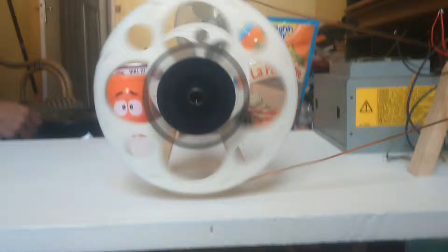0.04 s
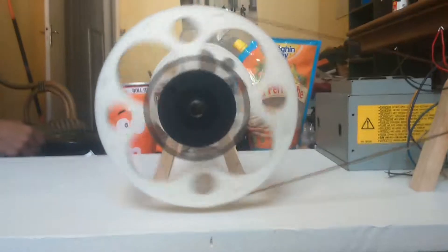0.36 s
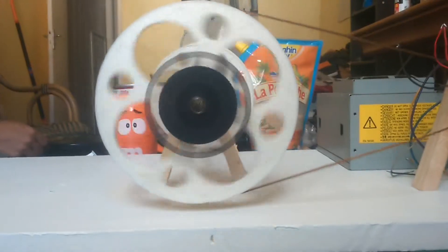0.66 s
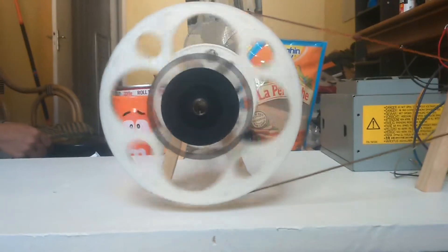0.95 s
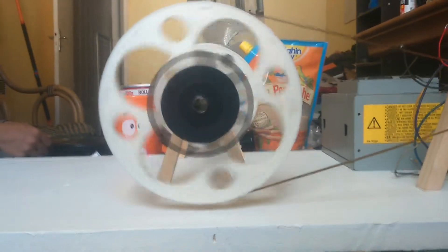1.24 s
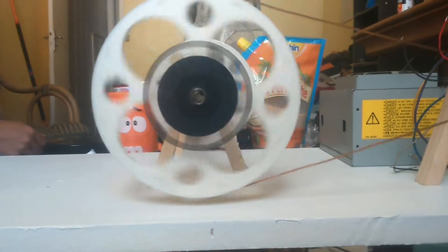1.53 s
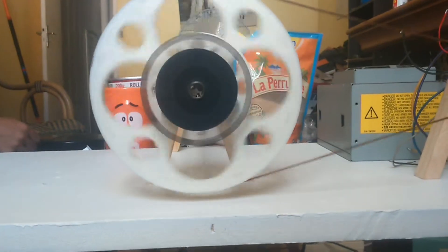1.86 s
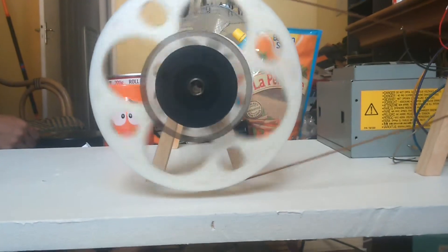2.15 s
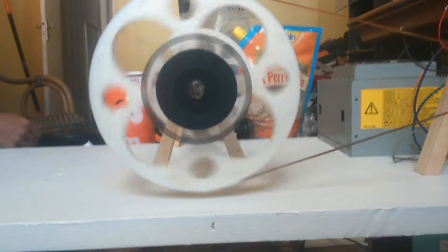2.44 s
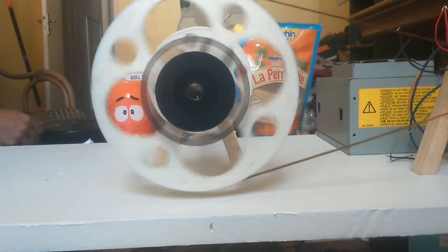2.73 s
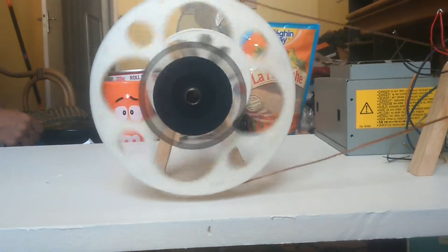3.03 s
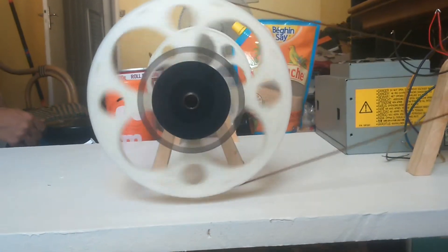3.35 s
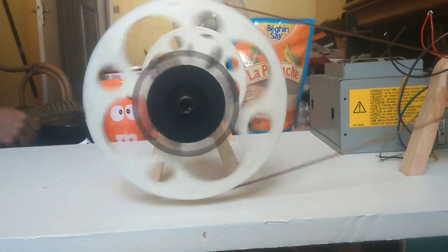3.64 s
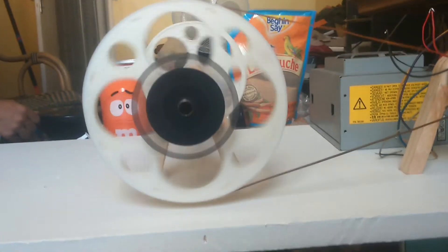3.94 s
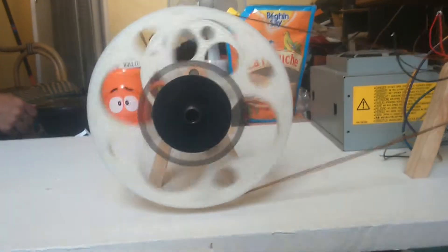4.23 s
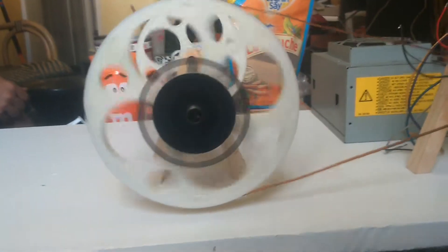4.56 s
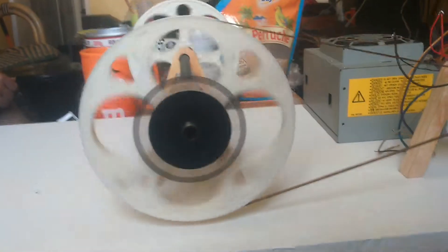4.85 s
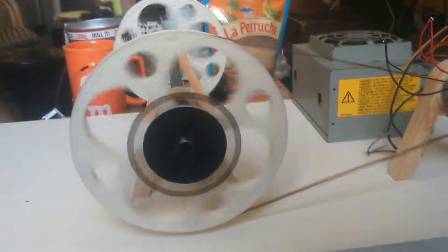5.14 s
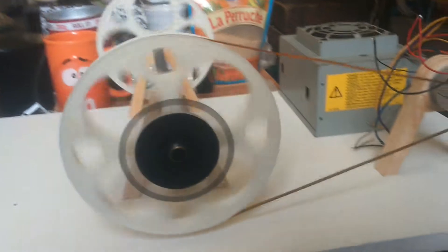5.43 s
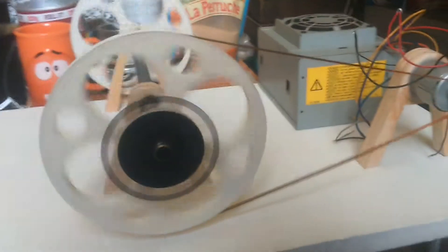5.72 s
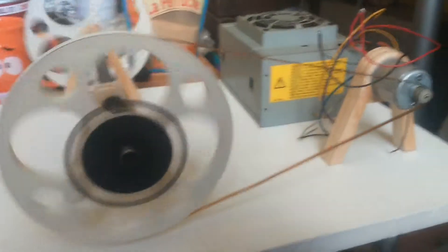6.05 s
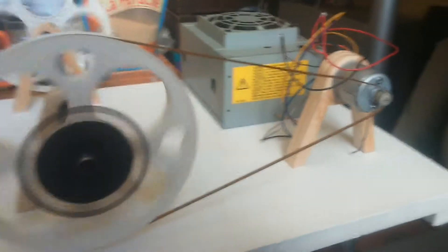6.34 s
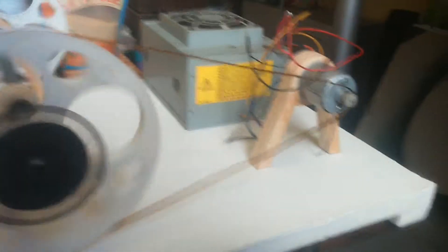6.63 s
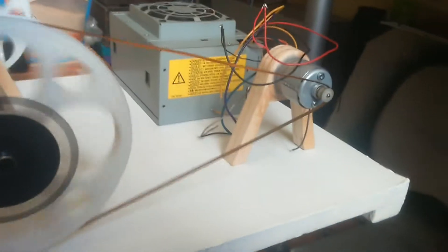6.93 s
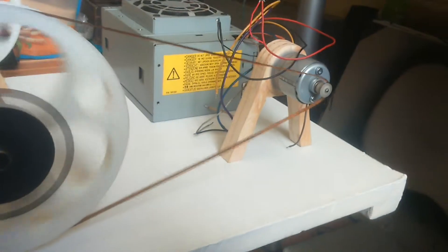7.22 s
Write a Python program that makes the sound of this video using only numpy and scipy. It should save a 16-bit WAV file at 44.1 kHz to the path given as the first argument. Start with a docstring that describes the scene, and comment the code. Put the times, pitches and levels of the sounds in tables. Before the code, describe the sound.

A small motor hums and whirs while a belt knocks over pulleys about once a second, with a friction hiss swelling later.

```python
"""On a workshop table, a small motor drives a large plastic pulley through a thin belt.
Once a lap the belt joint knocks over the pulleys and excites the modes of their wooden stands.
The motor's hum beats against the mains hum of its supply, the bearings whir and the table rumbles.
A friction hiss swells as the listener nears the motor. Parts tick and clink; the belt squeaks once."""
import sys
import numpy as np
from scipy import signal
from scipy.fft import rfft, irfft, next_fast_len
from scipy.io import wavfile
from scipy.ndimage import uniform_filter1d

SR = 44100
rng = np.random.default_rng(int(sys.argv[2]) if len(sys.argv) > 2 else 0)


def put_to_file(sound):
    """Save the sound as 16-bit audio at rate SR, in the file named by the first command-line argument."""
    columns = np.atleast_2d(sound).T  # one column per channel
    safe = np.clip(columns, -1, 1)
    whole_steps = np.round(safe * 32767)
    wavfile.write(sys.argv[1], SR, whole_steps.astype(np.int16))


N = 329868
T = np.arange(N) / SR
MOTOR_HZ, MAINS_HZ = 47.775, 50.005

# The belt joint returns about every 0.92 s. Each row: start in seconds, then gains in dB
# for the whole lap, the bass, the middle, the treble and the late rattle.
LAPS = [(0.361, -7.5, 2.5, -0.5, 6.5, 5.5), (1.284, 0, 4.5, -2, -3, -6.5), (2.198, 2, -1.5, -4, -1.5, -1),
        (3.116, -.5, -2, -4, -3, 3.5), (4.036, 1, -1.5, -4, 1, 2.5), (4.954, -2, 2.5, 2.5, 0, -3),
        (5.874, -2, 3.5, 3.5, -2.5, -4), (6.791, 0.5, 0, 3, 3.5, -8)]
# The blows within a lap. Each row: delay in seconds, then overall, bass and treble gains in dB.
BOUNCES = [(-.0045, -6.5, 1.5, -3), (0, 2, -2, 2), (.0098, -6.5, 8.5, -4), (.0197, 0, 11.5, -3.5),
           (.0295, -2.5, 6.5, 3), (.059, -10.5, 11, 1), (.079, -13.5, 12.5, -19), (.103, -6, -8, -18)]
# Modes of the stands and table top. Each row: frequency in Hz, relative level in dB, T60 in seconds.
STAND_MODES = [(142, -41, 0.22), (205.2, 0, 0.12), (265.7, 5, 0.065), (291.4, -9, 0.19), (372, -2, 0.047),
               (417.4, -8.5, 0.24), (454, -2.5, 0.2), (568, -7, 0.24), (627, -1.5, 0.033),
               (705.7, 6.5, 0.095), (747, -5.5, 0.29), (767, 9.5, 0.092), (780, 8, 0.058),
               (880, 15.5, 0.036), (990, -47, 0.018), (980, -13.5, 0.48), (1124, -18.5, 0.16),
               (1349, -6, 0.086), (1534, 3.5, 0.11), (1536, 7, 0.046), (1882, 4, 0.013), (2150, -8, 0.064),
               (2450, -36, 0.076), (2960, -10, 0.037)]
# Harmonics of the shaft. Each row: multiple of the rotation rate, rms level in dB.
SHAFT_ORDERS = [(2, -82), (3, -70.5), (4, -74.5), (5, -86.5), (7, -75.5), (9, -86.5), (11, -81.5),
                (12, -84.5), (16, -84.5)]
# Flutter of the free belt spans. Each row: frequency in Hz, rms level in dB.
BELT_FLUTTER = [(34.3, -74), (68.55, -64.5)]
# Motor whines. Each row: frequency in Hz, relative level in dB, fractional spread of pitch.
WHINES = [(3410, -25.5, 0.00555), (7270, 6, 0.00516), (7550, 1, 0.00041), (9240, -1, .0015),
          (12100, -19, 0.0062)]
# Ticks, scrapes and a snap. Each row: start in seconds, level in dB, pitch and width in Hz, T60 in seconds.
TICKS = [(1.331, -52.5, 2590, 2400, .12), (1.943, -58.5, 9000, 3500, .09), (2.260, -59.5, 8850, 3000, .1),
         (2.597, -54, 7800, 2600, .07), (4.085, -69, 4020, 4000, 0.74), (5.926, -54.5, 2400, 2470, 0.44),
         (6.1432, -36, 7600, 2510, 0.0087), (6.2099, -36, 10900, 7100, 0.011),
         (6.2172, -37.5, 8250, 2660, 0.051), (6.2208, -41, 3470, 800, 0.039),
         (6.223, -46.5, 2080, 1700, 0.057)]
# Clinks of a loose part. Each row: start in seconds, level in dB.
CLINKS = [(2.597, -57), (3.255, -41.5), (3.284, -44.5), (3.299, -50)]
# Workshop reverberation. Each row: frequency in Hz, T60 in seconds.
ROOM_T60 = [(150, 0.86), (400, 0.93), (1000, 0.37), (3000, 1), (12000, 0.083)]

# Noise spectra. Each row: frequency in Hz, relative spectral density in dB.
CLATTER_SPECTRUM = [(80, -40), (135, -26), (200, -11), (245, -12), (360, -17), (440, -13), (570, -9),
                    (670, -1), (750, 0), (970, -4), (1190, -19), (1550, -12), (1780, -22), (2150, -21),
                    (3000, -29), (4400, -46), (7000, -66), (13000, -100)]
WHIR_SPECTRUM = [(150, -18), (260, 3.5), (309, 3.5), (337, -5), (359, 0), (448, -3), (477, -4.5), (674, -2),
                 (782, -1), (1400, -10.5), (2440, -9), (2630, -9), (3450, -19), (5000, -21.5),
                 (6500, -13.5), (11000, -120)]
SOFT_RUB_SPECTRUM = [(3500, -28), (4800, -16), (5800, -4), (7200, 0), (8600, 3), (10300, -4), (12800, -9),
                     (15700, -12)]
RINGING_RUB_SPECTRUM = [(3000, -40), (4600, -28), (5700, -14), (6500, -11), (7200, 1), (8200, -6),
                        (8800, -1), (9400, -5), (10100, -16), (11500, -7), (12100, -14), (13000, -11),
                        (13500, -14), (15700, -21)]
RUMBLE_SPECTRUM = [(22, -32), (33, -14), (42, 7), (55, 0.5), (67, 10.5), (82, -8), (115, -8.5),
                   (132, -13.5), (148, 2), (180, -3.5), (206, 5.5), (228, -9.5), (300, -30), (420, -36),
                   (3000, -77)]
RUSH_SPECTRUM = [(70, -20), (110, -13), (150, -12.5), (210, -11), (330, -5.5), (700, -13), (1150, -22),
                 (2500, -20.5), (3300, -28.5), (4700, -28.5), (5500, -24), (6500, -31), (10000, -38),
                 (15700, -40)]

# Noise envelopes. Each row: time in seconds, base level in dB.
WHIR_LEVELS = [(.4, -66), (3.0, -68), (5.6, -62), (7.48, -64.5)]
RUB_LEVELS = [(0.46, -63.5), (1.24, -66.5), (1.35, -64.5), (2.9, -66), (4.39, -59.5), (4.5, -54.0),
              (5.05, -61), (5.29, -53), (5.54, -52), (5.62, -49.5), (6.09, -52.0), (6.13, -56),
              (6.39, -55.5), (6.5, -62.0), (6.7, -68.0), (6.96, -66.0), (7.0, -63.5), (7.42, -67.5)]
RUMBLE_LEVELS = [(.4, -52), (1.5, -51), (1.75, -59.5), (2.55, -60.5), (2.8, -54.5), (3.7, -59),
                 (4.2, -54.5), (7.48, -55)]
HISS_LEVELS = [(.4, -77), (1.9, -72.5), (4.2, -74.5), (7.48, -84)]


def amp(db):
    """Amplitude ratio of a level in decibels."""
    return 10 ** (np.asarray(db) / 20)


def unit(x):
    """Normalisation to rms 1."""
    return x / np.sqrt(np.mean(x ** 2) + 1e-20)


def curve(rows):
    """Linear interpolation of a time table at every sample."""
    return np.interp(T, *np.transpose(rows))


def read(points, hz):
    """Interpolation of a table on a log-frequency axis."""
    f, value = np.transpose(points)
    return np.interp(np.log(hz + 1), np.log(f + 1), value)


def add(mix, start_s, sound):
    """Superposition of a sound on the mix."""
    part = mix[round(start_s * SR):][:len(sound)]
    part += sound[:len(part)]


def colour(x, spectrum):
    """Filtering by multiplication of spectra, at rms 1."""
    hz = np.fft.rfftfreq(len(x), 1 / SR)
    return unit(irfft(rfft(x) * amp(read(spectrum, hz)), len(x)))


def noise(spectrum):
    """Stationary noise with a given spectrum."""
    return colour(rng.standard_normal(next_fast_len(N)), spectrum)[:N]


def drift(rate_hz):
    """Low-pass noise of rms 1, for random modulation."""
    hz = np.fft.rfftfreq(N, 1 / SR)
    return unit(irfft(rfft(rng.standard_normal(N)) * np.exp(-(hz / rate_hz) ** 2), N))


def causal(gain_db):
    """Minimum phase: the most compact causal pulse with this spectrum."""
    log_gain = np.log(amp(np.concatenate([gain_db, gain_db[-2:0:-1]])))
    return np.fft.ifft(np.exp(np.conj(signal.hilbert(log_gain)))).real


def flat_burst(t, t60):
    """Modal overlap: many small modes merge into decaying noise with an even spectrum."""
    spectrum = rfft(rng.standard_normal(len(t)) * amp(-60 * t / t60))
    even = irfft(spectrum / np.sqrt(uniform_filter1d(abs(spectrum) ** 2, 61)), len(t))
    return even * np.minimum(1, amp(-60 * (t - t60) / t60))


def blows(rattle_s=0.1014, jitter_s=0.0012, jitter_db=0.1):
    """Repeated impact: every lap has the same bounces, the late ones more loosely timed."""
    for lap_s, lap_db, bass_db, middle_db, treble_db, rattle_db in LAPS:
        for delay_s, bounce_db, bounce_bass_db, bounce_treble_db in BOUNCES:
            lateness = np.clip(delay_s / rattle_s, 0, 1)
            shift, weakening = rng.standard_normal(2)
            start_s = lap_s + delay_s + lateness * jitter_s * shift
            db = lap_db + bounce_db + lateness * rattle_db - jitter_db * weakening
            tone = [(250, bass_db + bounce_bass_db), (600, 0.0099),
                    (950, middle_db), (1700, treble_db + bounce_treble_db)]
            yield start_s, db, tone


def belt_knocks(modes_db=-50, clatter_db=-39, scatter_db=2, clatter_t60=0.06):
    """Modal response: each blow meets the stands at a new spot and so weights their modes anew."""
    t = np.arange(SR // 2) / SR
    hz = np.fft.rfftfreq(2048, 1 / SR)
    modes = np.array([(-1) ** k * amp(db - 60 * t / t60) * np.sin(2 * np.pi * f * t)
                      for k, (f, db, t60) in enumerate(STAND_MODES)])
    body = causal(read(CLATTER_SPECTRUM, hz))
    body /= np.linalg.norm(body)
    attack = np.minimum(t / 0.002, 1)
    out = np.zeros(N)
    for start_s, db, tone in blows():
        ring = amp(scatter_db * rng.standard_normal(len(modes))) @ modes
        clatter = signal.fftconvolve(flat_burst(t, clatter_t60), body)[:len(t)]
        clatter *= np.sqrt(SR * clatter_t60 / np.log(10 ** 6))  # starts at rms 1
        response = (amp(modes_db) * ring + amp(clatter_db) * clatter) * attack
        force = causal(db + read(tone, hz))
        add(out, start_s, signal.fftconvolve(response, force))
    return out


def hum(motor_db=-55.5, mains_db=-54.5, in_step_s=4.638, wobble_turns=0.0076, waver_db=3.5):
    """Beating: motor and mains hum throb at their difference frequency; the belt flutters along."""
    t = T - in_step_s
    turns = MOTOR_HZ * t + wobble_turns * drift(1.1)
    out = amp(mains_db) * np.cos(2 * np.pi * MAINS_HZ * t) + amp(motor_db) * np.cos(2 * np.pi * turns)
    for order, db in SHAFT_ORDERS:
        out += amp(db + waver_db * drift(2.1)) * np.cos(2 * np.pi * order * turns)
    for hz, db in BELT_FLUTTER:
        out += amp(db + waver_db * drift(14)) * np.sin(2 * np.pi * (hz * T + rng.random()))
    return np.sqrt(2) * out


def ringing(start_s=5.19, end_s=6.53, fade_s=0.12):
    """Envelope of the resonance in the metal parts, from 0 to 1 and back."""
    return np.clip(np.minimum(T - start_s, end_s - T) / fade_s, 0, 1)


def motor_whine(steady_db=-90.5, ringing_db=-70):
    """Random frequency modulation broadens thin tones, which grow while the metal rings."""
    tones = np.zeros(N)
    for hz, db, spread in WHINES:
        cycles = np.cumsum(hz * (1 + spread * drift(86.7))) / SR
        tones += amp(db) * np.sin(2 * np.pi * cycles)
    return (amp(steady_db) + amp(ringing_db) * ringing() ** 2) * tones


def shaft_pulse(depth):
    """Amplitude modulation at the rotation rate of the shaft."""
    return 1 + depth * np.cos(2 * np.pi * MOTOR_HZ * T)


def bearing_whir():
    """Modulated noise: the bearings pulse with the shaft, louder as the listener nears."""
    return amp(curve(WHIR_LEVELS)) * noise(WHIR_SPECTRUM) * shaft_pulse(depth=0.13)


def rubbing(grain_db=2, flicker_db=1.03):
    """Sliding friction: a soft hiss gives way for a while to grains of contact ringing in metal."""
    grains = rng.standard_normal(N) * amp(grain_db * drift(1500)) * shaft_pulse(depth=0.041)
    ring_share = 0.96 * ringing()
    soft = np.sqrt(1 - ring_share) * noise(SOFT_RUB_SPECTRUM)
    resonant = np.sqrt(ring_share) * colour(grains, RINGING_RUB_SPECTRUM)
    level_db = curve(RUB_LEVELS) + curve([(1.5, -4.5), (1.75, -3)])
    return (soft + resonant) * amp(level_db + flicker_db * drift(28))


def table_rumble(shudder_db=3, shudder_hz=12):
    """Forced vibration: the table shudders unevenly under the machine."""
    shudder = noise(RUMBLE_SPECTRUM) * amp(shudder_db * drift(shudder_hz))
    return amp(curve(RUMBLE_LEVELS)) * unit(shudder)


def high_hiss():
    """Band-limited noise lingers faintly in the high treble."""
    spectrum = [(3000, -30), (8000, -10), (11500, 0), (15700, 0), (17000, -30)]
    return amp(curve(HISS_LEVELS)) * noise(spectrum)


def rush(level_db=-54, hold_s=1.596, sink_db_per_s=70):
    """Broadband noise holds its level, then decays exponentially."""
    return amp(level_db - sink_db_per_s * np.maximum(T - hold_s, 0)) * noise(RUSH_SPECTRUM)


def burst(db, pitch_hz, width_hz, t60):
    """Resonance shapes a decaying burst of friction, cut off after 0.2 s."""
    t = np.arange(SR // 5) / SR
    hz = np.fft.rfftfreq(len(t), 1 / SR)
    resonance = 1 / (1 + ((hz - pitch_hz) / width_hz) ** 2) ** 4
    band = irfft(rfft(rng.standard_normal(len(t))) * resonance, len(t))
    attack = np.minimum(t * width_hz / 2, 1)  # a narrow resonance speaks more slowly
    return unit(band) * amp(db - 60 * t / t60) * attack


def ticks():
    """Friction transients: each tick or scrape of the parts has its own resonance."""
    out = np.zeros(N)
    for start_s, db, pitch_hz, width_hz, t60 in TICKS:
        add(out, start_s, burst(db, pitch_hz, width_hz, t60))
    return out


def clinks():
    """Free vibration: a small loose part always clinks at its natural frequency."""
    out = np.zeros(N)
    for start_s, db in CLINKS:
        add(out, start_s, burst(db, pitch_hz=2510, width_hz=360, t60=0.038))
    return out


def belt_squeak(start_s=6.945, length_s=0.19, base_hz=8400, rise_hz=386, peak_db=-65, rough=0.00777):
    """Friction-excited oscillation: the slipping belt sings, higher as it grows louder."""
    arch = np.sin(np.pi * np.clip((T - start_s) / length_s, 0, 1)) ** 2
    pitch_hz = (base_hz + rise_hz * arch) * (1 + rough * drift(390))
    return amp(peak_db) * arch * np.sin(2 * np.pi * np.cumsum(pitch_hz) / SR)


def room(x, build_s=0.0022):
    """Reverberation: diffuse reflections build up, then each band decays at its own rate."""
    hz, t, bands = signal.stft(rng.standard_normal(SR * 3 // 4), SR, nperseg=256)
    envelope = amp(-60 * t / read(ROOM_T60, hz)[:, None]) * (1 - np.exp(-t / build_s))
    tail = signal.istft(bands * envelope, SR, nperseg=256)[1]
    return signal.fftconvolve(x, tail / np.linalg.norm(tail))[:N]


def scene(knock_room_db=-9, small_room_db=-20):
    """Superposition of all sources in one channel; only the brief sounds reverberate."""
    knocks = belt_knocks()
    small_sounds = ticks() + clinks() + belt_squeak()
    reflections = room(amp(knock_room_db) * knocks + amp(small_room_db) * small_sounds)
    machine = hum() + motor_whine() + bearing_whir() + rubbing()
    background = table_rumble() + high_hiss() + rush()
    return (knocks + small_sounds + reflections + machine + background)[None]


def record(dry, start_s=0.383, cutoff_hz=15730):
    """Gating and band limiting: after a silence the sound enters in 1 ms, through a low-pass filter."""
    gate = np.clip((T - start_s) * 1000, 0, 1)
    low_pass = signal.firwin(801, cutoff_hz, window=("kaiser", 9), fs=SR)
    return signal.oaconvolve(dry * gate, low_pass[None], "same")


dry = scene()
out = record(dry)
put_to_file(out)
```